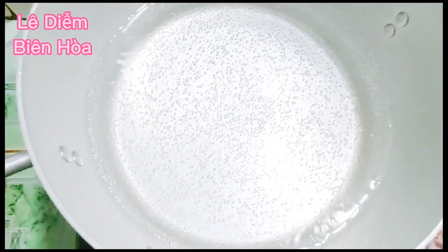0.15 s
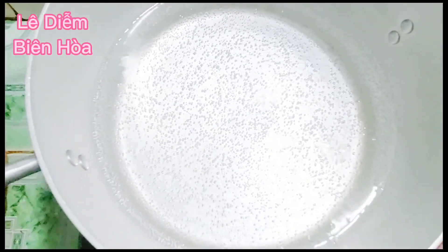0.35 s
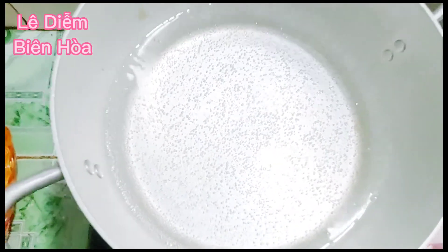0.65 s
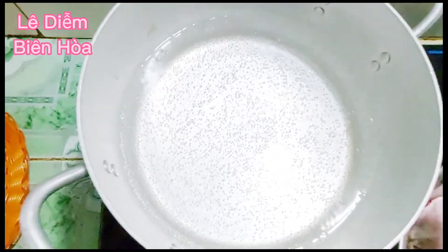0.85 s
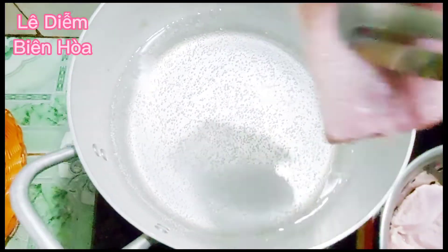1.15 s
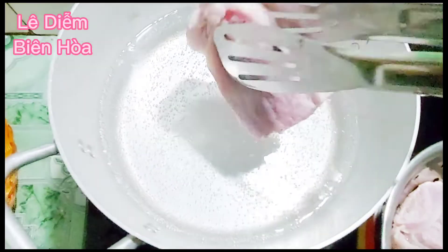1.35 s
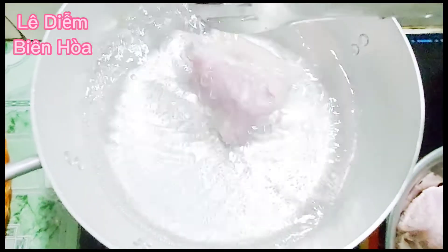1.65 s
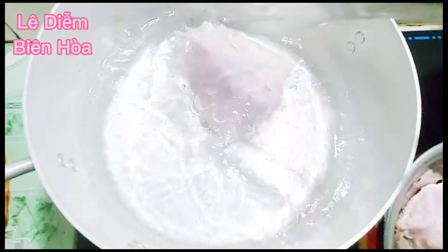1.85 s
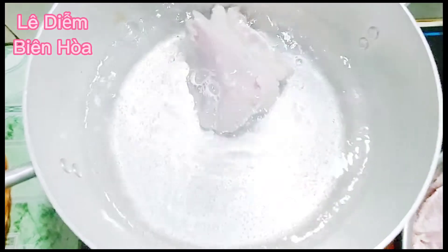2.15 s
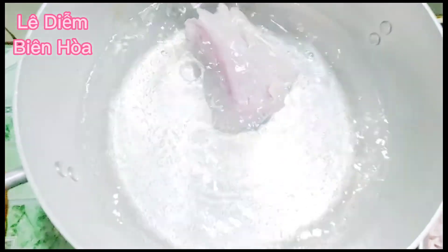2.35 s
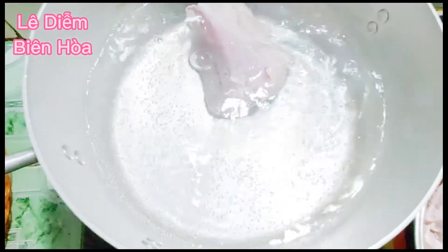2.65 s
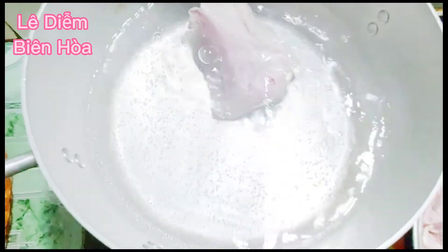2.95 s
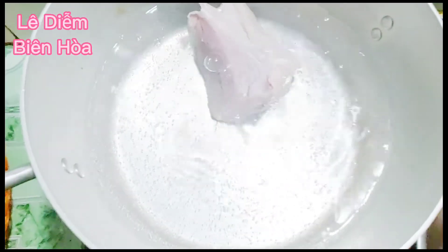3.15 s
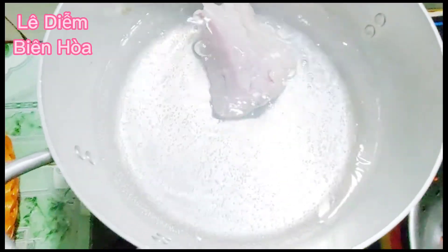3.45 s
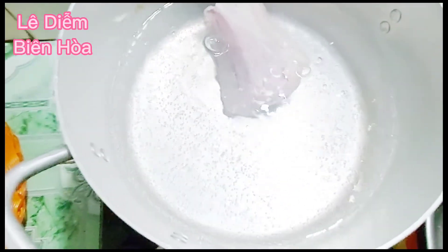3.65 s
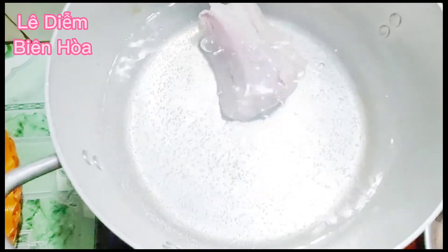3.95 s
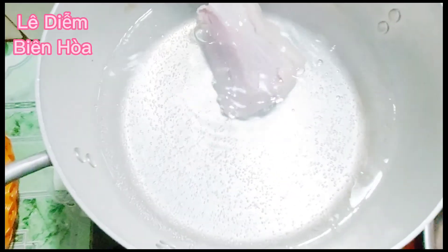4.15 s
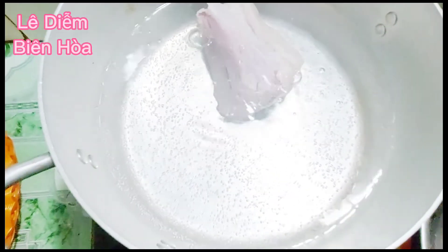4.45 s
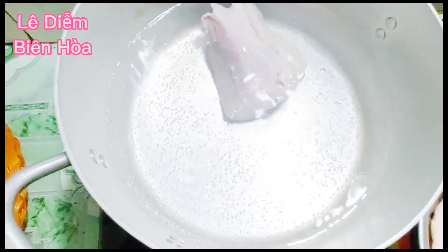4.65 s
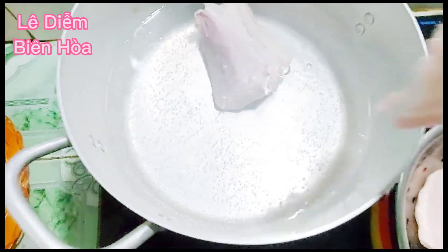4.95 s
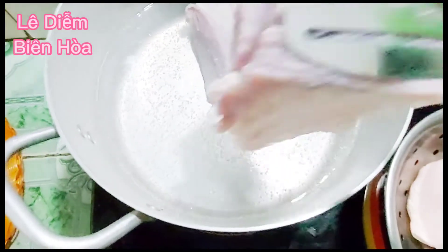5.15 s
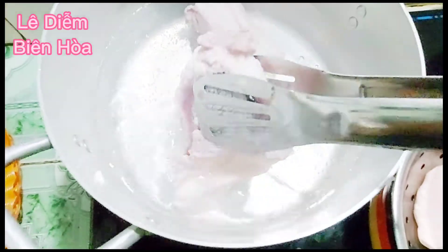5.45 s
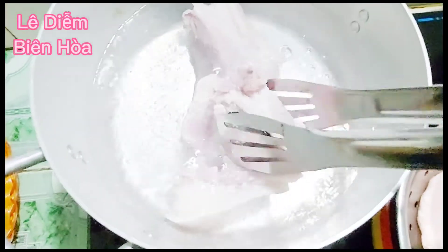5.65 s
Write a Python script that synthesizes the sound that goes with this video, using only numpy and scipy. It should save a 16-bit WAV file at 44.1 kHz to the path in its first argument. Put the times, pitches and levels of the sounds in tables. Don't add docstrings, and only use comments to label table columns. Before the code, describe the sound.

In a hard-walled kitchen, a close stereo microphone hears a gas flame roaring and hissing beneath faintly ticking water. Meat slaps into the pot with a sharp splash, bubbly plop and low air thump on the right. The background ducks, then recovers; later tongs ring against a bowl, clatter, and scrape a rim, with dishes clinking further off.

```python
import sys
import numpy as np
from scipy import signal
from scipy.io import wavfile
from scipy.ndimage import uniform_filter1d

SR = 44100
rng = np.random.default_rng(int(sys.argv[2]) if len(sys.argv) > 2 else 0)


def convert_level_to_amplitude(level_db):
    exponent = np.asarray(level_db, float) / 20
    return 10 ** exponent


def digitize_waveform(pressure):
    field = np.atleast_2d(pressure).T
    bounded = np.clip(field, -1, 1)
    quanta = np.round(bounded * 32767).astype(np.int16)
    wavfile.write(sys.argv[1], SR, quanta)


N = 256662
SPLASH_S = 1.5532


def evened(x):
    return x / np.sqrt(np.mean(x ** 2) + 1e-20)


def read(points, hz):
    f, value = np.transpose(points)
    return np.interp(np.log(hz + 1), np.log(f + 1), value)


def add(mix, s, sound, pan_db, lag_ms=0.3):
    for side, sign, late in ((0, 1, lag_ms / 1000), (1, -1, 0)):
        part = mix[side, round((s + late) * SR):][:len(sound)]
        part += convert_level_to_amplitude(sign * pan_db / 2) * sound[:len(part)]


def coloured(x, spectrum):
    level_db = np.maximum(read(spectrum, abs(np.fft.fftfreq(4096, 1 / SR))), -100)
    log_response = np.conj(signal.hilbert(np.log(convert_level_to_amplitude(level_db))))
    taps = np.fft.ifft(np.exp(log_response)).real[:2048]
    return signal.oaconvolve(x, taps / np.linalg.norm(taps))


# start in seconds, depth of the gain dip in dB.
GAIN_DIPS = [
    (1.56, 10),
    (2.9, 0.5),
    (3.9, 4.5),
    (4.65, 4),
]


def ducking():
    sink_s, recover_db_per_s = 0.19, 4.5
    t, gain_db = np.arange(N) / SR, np.zeros(N)
    for s, depth_db in GAIN_DIPS:
        since = np.maximum(t - s, 0)
        gain_db -= np.maximum(depth_db - recover_db_per_s * since, 0) * (1 - np.exp(-since / sink_s))
    return gain_db


# frequency in Hz, likeness of left and right [0-1].
PORT_LIKENESS = [(60, 1), (150, 0.87), (380, 0.78), (950, 0.074), (2380, 0.11), (5980, 0.042), (15000, 0.0)]
# frequency in Hz, left over right in dB.
BURNER_LEAN = [(60, 1.5), (180, -3), (550, 0), (1650, 4), (4970, -2.5), (15000, 5.5)]


def gas_noise(spectrum, peaks, patchy_db, swell_db, size):
    hop = size // 4
    frames, hz = N // hop + 5, np.fft.rfftfreq(size, 1 / SR)
    a, b, c, d, patches = rng.standard_normal((frames, len(hz), 5)).T
    patches = uniform_filter1d(patches, size=12, axis=0)
    patches = evened(uniform_filter1d(patches, size=6, axis=1))
    swell = evened(uniform_filter1d(rng.standard_normal(frames), size=5))
    humps_db = sum(db / (1 + (2 * (hz - f) / width) ** 2) for f, width, db in peaks)
    shape_db = read(spectrum, hz) + humps_db
    same = np.clip(read(PORT_LIKENESS, hz), -1, 1)[:, None]
    left = a + 1j * b
    right = same * left + np.sqrt(1 - same ** 2) * (c + 1j * d)
    lean = convert_level_to_amplitude(np.outer([0.5, -0.5], read(BURNER_LEAN, hz)))[:, :, None]
    level = convert_level_to_amplitude(shape_db[:, None] + patchy_db * patches + swell_db * swell)
    z = np.array([left, right]) * lean * level
    return evened(signal.istft(z, nperseg=size, noverlap=size - hop)[1][:, :N])


# frequency in Hz, level in dB per Hz.
ROAR_COLOUR = [(20, -45), (32, -12), (48, -14), (81, 1.5), (150, -6.5), (215, -16), (250, -13.5),
               (341, -16.5), (400, -8), (520, -29.5), (700, -51)]
# frequency in Hz, width in Hz, level in dB.
ROAR_HUMPS = [(86, 52, 3.5), (144.5, 10, 8.5), (269.7, 37, 10.5), (307.5, 21.4, 11.5), (346.3, 7.7, 12.5),
              (398, 11, -8.5)]
# frequency in Hz, level in dB per Hz.
RUSH_COLOUR = [(350, -5.5), (520, 0), (800, -5.5), (1260, -10), (1600, -12), (2200, -17), (3000, -22),
               (3500, -25), (4200, -17.5), (4800, -40)]
# frequency in Hz, width in Hz, level in dB.
RUSH_HUMPS = [(1006.6, 29.4, 14), (1190, 54, 1), (2200, 50, 10)]
# frequency in Hz, level in dB per Hz.
HISS_COLOUR = [(3800, -23.5), (4300, -17), (5010, -9), (5440, -5.5), (5640, -3), (5830, -5), (6200, -13),
               (7000, -19.5), (7680, -43), (8950, -36), (11200, -15.5), (14900, -22.5), (16500, -33)]
# frequency in Hz, width in Hz, level in dB.
JET_HUMPS = [(4230, 43, 14), (5384, 46, 13), (5660, 42.5, 15), (11100, 110, 0.5)]
# time in seconds, level change in dB.
FLAME_DRAUGHT = [(0, -1.5), (.4, 2), (.8, -2), (1.2, -1.5), (1.45, 0), (3.0, 0.5), (4.9, 1), (5.3, 0.5),
                 (5.55, -1.5), (5.82, 5)]


def burner():
    roar = gas_noise(ROAR_COLOUR, ROAR_HUMPS, patchy_db=2.5, swell_db=0.82, size=4096)
    rush = gas_noise(RUSH_COLOUR, RUSH_HUMPS, patchy_db=2.0, swell_db=0.63, size=1024)
    hiss = gas_noise(HISS_COLOUR, JET_HUMPS, patchy_db=-0.3, swell_db=1.46, size=1024)
    dip = ducking()
    air = np.interp(np.arange(N) / SR, *np.transpose(FLAME_DRAUGHT))
    roar *= convert_level_to_amplitude(-38 + dip + 0.2 * air)
    rush *= convert_level_to_amplitude(-49 + 1.18 * dip + air)
    hiss *= convert_level_to_amplitude(-51 + 0.84 * dip + 0.23 * air)
    return roar + rush + hiss


# frequency in Hz, rms level at full flame in dB.
BURNER_TONES = [
    (147, -50),
    (341.5, -48),
    (392, -68),
    (5641, -65),
]


def whistles():
    t, out = np.arange(N) / SR, np.zeros(N)
    for hz, db in BURNER_TONES:
        wander = rng.standard_normal((2, 60))
        drift, sway = (evened(np.interp(t, np.arange(60) / 10, v)) for v in wander)
        turns = np.cumsum(hz + 2.48 * drift) / SR
        out += convert_level_to_amplitude(db + 2.16 * sway) * np.sin(2 * np.pi * turns)
    return out * convert_level_to_amplitude(ducking() + 4.0)


def simmer():
    out, t = np.zeros((2, N)), np.arange(SR // 50) / SR
    for when, pitch, size, side in rng.random((150, 4)):
        hz = 4600 * (1 + 0.25 * pitch)
        tick = np.sin(2 * np.pi * hz * t) * t * hz * np.exp(-t * hz / 1.06)
        add(out, when * N / SR, convert_level_to_amplitude(-37 - 9.0 * size) * tick, 6.0 * (side - 0.5))
    return out


def clicks(rows, cycles):
    out, t = np.zeros((2, N)), np.arange(SR // 50) / SR
    for s, db, hz, pan_db in rows:
        u = 4.2 * t * hz / cycles
        add(out, s, convert_level_to_amplitude(db) * np.sin(2 * np.pi * hz * t) * u * np.exp(1 - u), pan_db)
    return out


# start in seconds, peak in dB, frequency in Hz, left over right in dB.
DROPLETS = [(.0907, -37, 4870, 10), (.338, -44, 4080, -7), (1.372, -36, 4660, 4), (1.4556, -35, 4500, -2),
            (1.4815, -29.5, 4150, -6), (1.5115, -40, 4080, -17), (2.0782, -32.5, 5150, 5),
            (2.994, -42, 6700, -23), (3.16, -45, 6277, -16), (4.4478, -33, 14500, -6),
            (4.4767, -28, 14500, -10), (4.5101, -27, 12200, -6), (5.25, -40, 4300, 2),
            (5.25, -48, 3220, 17), (5.32, -45, 6300, -8), (5.2974, -41, 3180, 10), (5.2974, -35, 4360, -1),
            (5.3697, -37, 4570, 3)]


def drips():
    return clicks(DROPLETS, cycles=10)


# start in seconds, peak in dB, frequency in Hz, decay time t60 in seconds.
FAR_DISHES = [(0.132, -41, 4680, 0.055), (.1406, -33, 2147, 0.068), (.1406, -40.5, 1943, 0.14),
              (.209, -59, 2200, 0.54), (1.064, -41, 1190, 0.1), (1.3332, -35.5, 1660, 0.083),
              (2.205, -50, 1760, 0.14), (4.673, -47.5, 3990, 0.17), (4.672, -44, 5620, 0.13),
              (4.712, -37, 1217, 0.1), (2.5189, -33.5, 1568, 0.081), (2.5204, -39, 1420, 0.066),
              (2.5197, -49, 633, 0.1), (2.5197, -46, 2180, .08), (2.575, -58, 1625, 0.12),
              (2.723, -51.5, 2690, 0.16), (2.7222, -50.5, 3330, 0.07), (3.7477, -40, 1257, 0.13),
              (3.7978, -46, 2490, 0.13), (3.831, -31, 2450, 0.093), (4.0657, -25, 2000, 0.0071),
              (4.3965, -22, 2200, 0.05), (4.3965, -42, 2610, 0.019), (5.042, -32, 1775, 0.058),
              (5.0424, -37, 1490, 0.041), (5.1, -55, 1790, 0.086), (5.051, -56, 3670, 0.21),
              (5.39, -43, 1156, .15), (5.709, -33.5, 4400, 0.035), (5.7157, -38, 3810, 0.067)]
CLUSTER_SPREAD = [-1, -.4, 0, .5, 1]
# frequency in Hz, left over right in dB.
BODY_SHADE = [(700, 4), (1200, 1.5), (2100, -4), (2600, -4), (4400, -8)]


def clinks():
    out, t = np.zeros((2, N)), np.arange(SR // 2) / SR
    strike = convert_level_to_amplitude(4) * np.exp(-t / 0.002)
    rise = np.minimum(t / 0.0007, 1)
    for s, db, hz, t60 in FAR_DISHES:
        cluster = strike * np.sin(2 * np.pi * hz * t)
        for k, phase in zip(CLUSTER_SPREAD, rng.random(len(CLUSTER_SPREAD))):
            fall = convert_level_to_amplitude(-60 * t * (1 + 2.7 * abs(k)) / t60)
            cluster += fall * np.sin(2 * np.pi * (hz * (1 + 0.046 * k) * t + phase))
        add(out, s, convert_level_to_amplitude(db - 2) * cluster * rise, read(BODY_SHADE, hz))
    return out


# start in seconds, length in seconds, level in dB, treble level in dB.
MEAT_RUSTLES = [
    (.22, .12, -57, -59),
    (1.464, 0.088, -45.5, -54),
    (1.531, 0.019, -38.5, -36),
    (1.781, 0.019, -44.5, -65),
    (3.388, 0.12, -53, -60),
    (3.789, 0.056, -45, -52),
    (4.413, 0.11, -48.5, -55),
]


def wetness():
    u = np.arange(N) / SR - SPLASH_S
    burst = convert_level_to_amplitude(-14.5 - 1803 * abs(u)) * np.clip(u / 0.00065 + 1, 0, 1)
    shower = convert_level_to_amplitude(-26.5 - 103.5 * abs(u)) * (u > 0) * np.clip((0.38 - u) / 0.16, 0, 1)
    level = np.outer([1, convert_level_to_amplitude(-9)], burst + shower)
    for s, length, db, treble_db in MEAT_RUSTLES:
        fade = signal.windows.tukey(round(length * SR), 0.48)
        level[:, round(s * SR):][:, :len(fade)] += np.outer(convert_level_to_amplitude([db, treble_db]), fade)
    return level


# frequency in Hz, level in dB per Hz.
SPRAY_BODY = [(500, -54), (1000, -6.5), (1700, -5), (2430, 2.5), (3100, -2), (4500, 3), (6160, 2),
              (7120, -2.5), (7690, -9.5), (9000, -68)]
# frequency in Hz, level in dB per Hz.
SPRAY_TREBLE = [(4710, -36.5), (8000, -12.5), (9430, -19.5), (11600, -3.5), (13500, -8), (15600, -9),
                (16100, -26)]


def spray():
    out, level = np.zeros((2, N)), wetness()
    sizes = convert_level_to_amplitude(6.8 * np.minimum(rng.exponential(1, N), 5))
    drops = sizes * (rng.random(N) < 3000 / SR)
    for side, lag in ((0, 12), (1, 0)):
        grain = 0.6 * evened(np.roll(drops, lag) * rng.choice([-1, 1], N)) + rng.standard_normal(N)
        for envelope, colour in zip(level, (SPRAY_BODY, SPRAY_TREBLE)):
            out[side] += envelope * evened(coloured(grain, colour)[:N])
    return out * convert_level_to_amplitude([[-0.5], [2.5]])


# start in seconds, peak in dB, frequency in Hz, left over right in dB.
TONG_SNAPS = [(1.474, -36, 5000, 0), (1.7858, -28.5, 2830, -10), (1.9046, -38.5, 12600, 14),
              (4.148, -45, 11000, -17), (4.3335, -35, 11600, 7), (4.4293, -39, 9200, -8),
              (4.4478, -26, 5950, -15), (4.553, -22, 5500, -13), (4.5846, -3.5, 5850, -8.5),
              (4.628, -13.5, 5740, -20), (4.627, -10, 13500, -4), (5.562, -32, 5500, 0),
              (5.5712, -34, 5200, 4)]


def snaps():
    return clicks(TONG_SNAPS, cycles=2.4)


# peak in dB, length in seconds, left over right in dB.
MEAT_SLAP = (-19.5, 0.011, -7)
# start in seconds, peak in dB, frequency in Hz, t60 in seconds, rise as a factor.
AIR_BUBBLES = [
    (1.606, -13, 730, 0.0097, 1.26),
    (1.643, -18.5, 1250, 0.01, 1.18),
]
# start in seconds, end in seconds, level in dB, frequency in Hz.
POT_WALL = [
    (1.56, 1.732, -50, 2506),
    (1.659, 1.844, -56, 1046),
    (1.684, 1.798, -44.5, 1400),
    (1.786, 1.822, -47.5, 2524),
]


def plop():
    out, t = np.zeros((2, N)), np.arange(SR // 4) / SR
    db, length, pan_db = MEAT_SLAP
    slap = coloured(rng.standard_normal(len(t)) * np.exp(-t / length), SPRAY_BODY)
    add(out, SPLASH_S, convert_level_to_amplitude(db) * slap / abs(slap).max(), pan_db)
    for s, db, hz, t60, rise in AIR_BUBBLES:
        turns = hz * (t + (rise - 1) * t ** 2 / t60)
        bubble = convert_level_to_amplitude(db - 60 * t / t60) * np.sin(2 * np.pi * turns) * np.minimum(t / 0.0013, 1)
        add(out, s, bubble, 1.5, lag_ms=0)
    for start, end, db, hz in POT_WALL:
        u = np.arange(0, end - start, 1 / SR)
        tone = np.sin(2 * np.pi * hz * u) * signal.windows.tukey(len(u), 0.4)
        add(out, start, convert_level_to_amplitude(db) * tone, -9.0)
    return out


# level in dB, width in seconds, rebound in dB, rebound in Hz, t60 in seconds.
AIR_PUSH = (-2, .0007, -8, 54, .11)


def puff():
    db, width, rebound_db, hz, t60 = AIR_PUSH
    t = np.maximum(np.arange(N) / SR - SPLASH_S, 0)
    push = -convert_level_to_amplitude(db) * t / width * np.exp(1 - t / width)
    rebound = convert_level_to_amplitude(rebound_db - 60 * t / t60) * np.sin(2 * np.pi * hz * t)
    return np.array([0.02 * rebound, push + rebound])


def blow(t, modes, crack, ring_db, length, crack_db, rise_s):
    rise, ring = np.minimum(t / rise_s, 1), np.zeros(len(t))
    for hz, db, t60 in modes:
        build_up = np.minimum(t * hz / 3.9, 1)
        ring += convert_level_to_amplitude(db - 60 * t / t60) * np.sin(2 * np.pi * (hz * t + rng.random())) * build_up
    scrape = rng.standard_normal(len(t)) * np.exp(-t / length) * rise
    snap = coloured(scrape, crack)[:len(t)]
    return convert_level_to_amplitude(ring_db + 1.0) * ring * rise + convert_level_to_amplitude(crack_db + 10.5) * snap


# start in seconds, ring in dB, contact length in seconds, crack in dB, rise in seconds.
TONG_KNOCKS = [
    (2.8611, -17, 0.016, -23, 0.00039),
    (2.995, -52, 0.0061, -38.5, 0.0021),
    (3.8443, -21, 0.014, -16, 0.00093),
    (3.937, -41, 0.017, -37, .0008),
    (4.5605, -15.5, 0.014, -22, 0.012),
    (4.584, -55, 0.013, -21, 0.007),
    (4.624, -36, 0.0062, -30.5, 0.00076),
    (4.672, -33.5, 0.0037, -34, 0.0022),
]
KNOCKED_OBJECT = [0, 0, 1, 1, 2, 2, 2, 2]
# frequency in Hz, level in dB, t60 in seconds.
BOWL_MODES = [(262, -3, 0.39), (292, -1, 0.16), (616, -5, 0.14), (682, 0, 0.096), (859, -16.5, 0.4),
              (1145, -1.5, 0.085), (1660, -0.5, 0.074), (2117, -3, 0.13), (2170, 1.5, 0.091),
              (2520, -21, 0.12), (3090, -19, 0.27), (4065, -3, 0.11), (4850, -10, 0.048), (5330, 8, 0.026),
              (5030, -1, 0.038), (5300, -11, 0.047), (5650, 5, 0.036), (6300, 3, 0.033)]
# frequency in Hz, level in dB, t60 in seconds.
TONGS_MODES = [(292, -8.5, 0.17), (409, 0.5, 0.053), (593, 1, 0.14), (730, 0.5, 0.1), (1180, -0.5, 0.13),
               (1722, 3, 0.18), (1785, -10, 0.062), (2090, 1, 0.062), (1990, 5.5, 0.14), (2215, -7, 0.097),
               (2420, 3.5, 0.058), (2984, -3.5, 0.36), (3200, -0.5, 0.21), (3510, 3, 0.15),
               (3650, -3, 0.13), (3900, 3, .12), (4110, 11.5, 0.032), (4060, -7, .06), (4770, 2, 0.091),
               (5560, 6, .06), (5200, -10, .05)]
# frequency in Hz, level in dB, t60 in seconds.
RIM_MODES = [(282, 6, 0.052), (445, 8, 0.042), (610, -5, 0.074), (765, -3.5, 0.066), (1248, -2, 0.038),
             (1638, -5, 0.039), (2040, -2, .07), (4100, 3, 0.081), (5020, 6, 0.024), (5780, -8, 0.041),
             (6300, -21, 0.056)]
# frequency in Hz, level in dB per Hz.
BOWL_CONTACT = [(150, -10.5), (300, 0.5), (520, -9.5), (700, -7), (1500, -8), (2200, -10.5), (3000, -7.5),
                (5300, -6.5), (7000, -14), (8000, -25), (11500, -29.5), (16500, -30)]
# frequency in Hz, level in dB per Hz.
TONGS_CONTACT = [(150, -22), (600, -4), (1000, -12.5), (2000, 4), (3700, -6), (5500, 3), (6200, -5),
                 (8000, -20), (11500, -18.5), (16500, -20)]
# frequency in Hz, level in dB per Hz.
RIM_CONTACT = [(88, -17), (150, -6.5), (614, -7.5), (1240, -9.5), (1600, 3.5), (2560, -6.5), (4020, 0),
               (6300, -0.5), (8780, -25), (14900, -10), (16100, -57)]
SHADE_DB = [-6, -5, -6.5]


def knocks():
    out, t = np.zeros((2, N)), np.arange(SR // 2) / SR
    objects = [(BOWL_MODES, BOWL_CONTACT), (TONGS_MODES, TONGS_CONTACT), (RIM_MODES, RIM_CONTACT)]
    shade_hz, same, lag_s = 980, 0.35, 0.00019
    low, high = (signal.butter(2, shade_hz, kind, fs=SR) for kind in ("low", "high"))
    for (s, *contact), k in zip(TONG_KNOCKS, KNOCKED_OBJECT):
        direct = blow(t, *objects[k], *contact)
        reflected = blow(t, *objects[k], *contact)
        shaded = convert_level_to_amplitude(SHADE_DB[k]) * (same * direct + np.sqrt(1 - same ** 2) * reflected)
        left = signal.filtfilt(*low, direct) + signal.filtfilt(*high, shaded)
        out[0, round((s + lag_s) * SR):][:len(t)] += left
        out[1, round(s * SR):][:len(t)] += direct
    return out


# frequency in Hz, reverberation t60 in seconds.
ROOM_DECAY = [(200, 0.77), (530, 0.73), (1390, 0.61), (3680, 0.57), (9700, 0.24)]


def kitchen(x):
    taps = np.zeros((2, SR))
    at = np.arange(100, SR - 20, 20)[:2000] + rng.integers(0, 20, (2, 2000))
    np.put_along_axis(taps, at, rng.choice([-1., 1.], at.shape), 1)
    hz, t, z = signal.stft(taps, SR, nperseg=256)
    same = np.clip(read(PORT_LIKENESS, hz), 0, 1)[:, None]
    z[0] = same * z[1] + np.sqrt(1 - same ** 2) * z[0]
    t60 = np.maximum(read(ROOM_DECAY, hz), 0.05)[:, None]
    tail = signal.istft(z * convert_level_to_amplitude(-60 * t / t60), SR, nperseg=256)[1]
    return signal.fftconvolve(x, tail / np.linalg.norm(tail[0]), axes=1)[:, :N]


def scene():
    gas = burner() + whistles()
    near = simmer() + drips() + snaps() + plop()
    far, metal = clinks(), knocks()
    wet = kitchen(convert_level_to_amplitude(-10.0) * near + convert_level_to_amplitude(-11.5) * metal + convert_level_to_amplitude(-2.5) * far)
    return gas + near + far + metal + wet + spray() + puff()


def band_limit(x):
    return signal.sosfilt(signal.butter(12, 16100, fs=SR, output="sos"), x)


def record(dry):
    mix = np.clip(dry, -1, 1)
    return band_limit(mix)


dry = scene()
out = record(dry)
digitize_waveform(out)
```